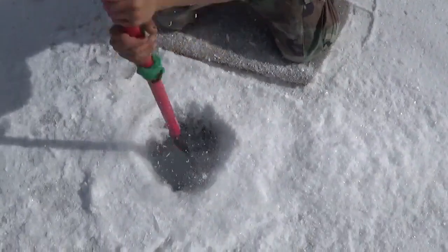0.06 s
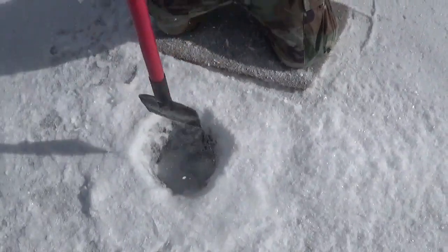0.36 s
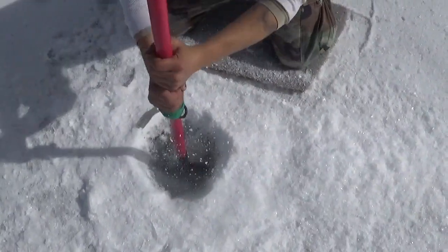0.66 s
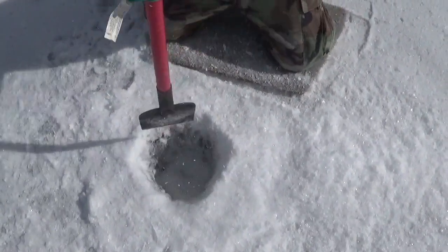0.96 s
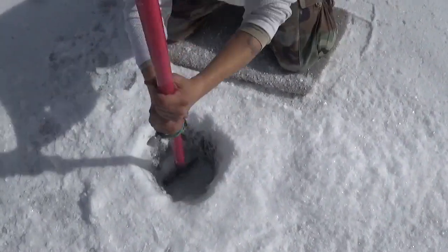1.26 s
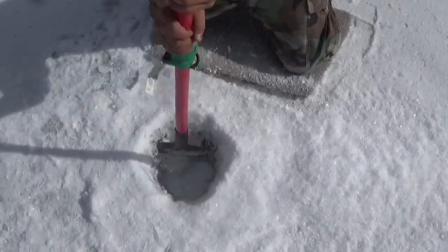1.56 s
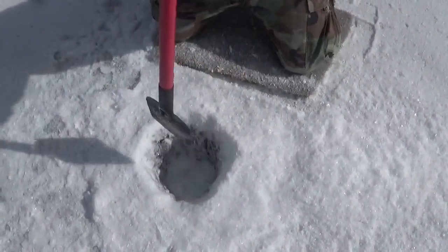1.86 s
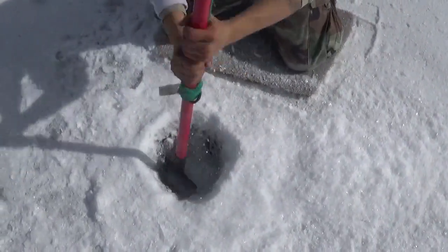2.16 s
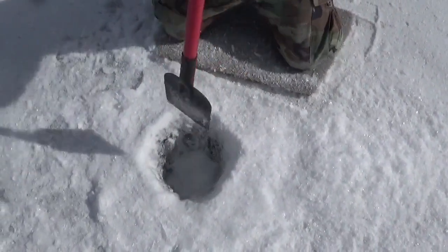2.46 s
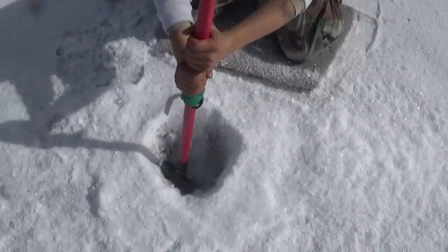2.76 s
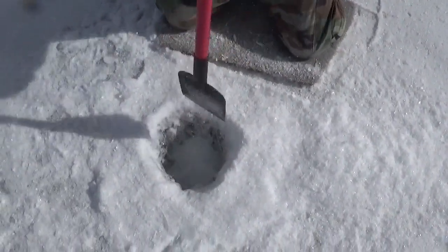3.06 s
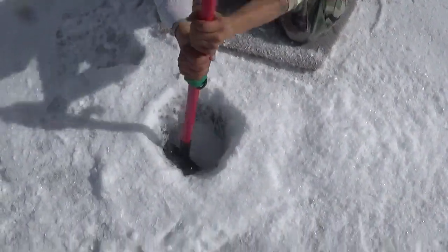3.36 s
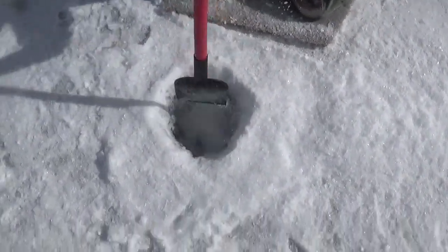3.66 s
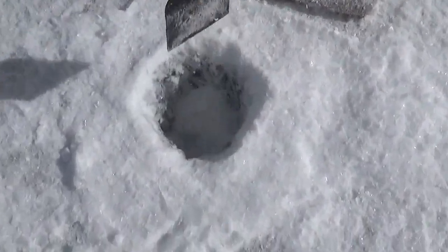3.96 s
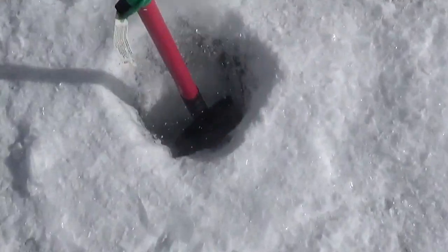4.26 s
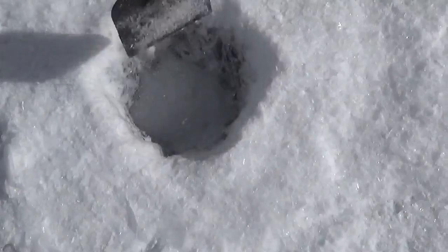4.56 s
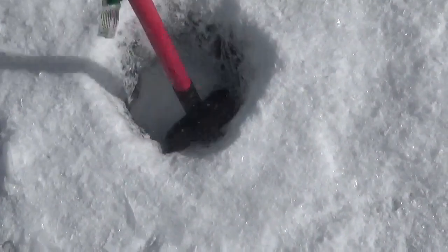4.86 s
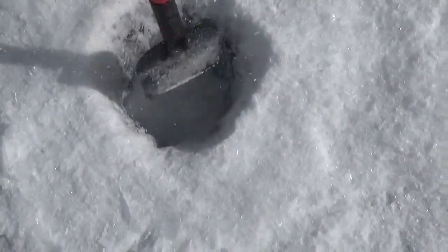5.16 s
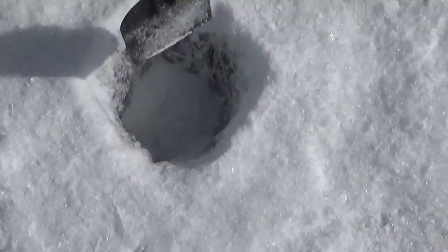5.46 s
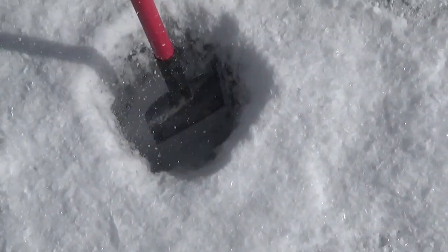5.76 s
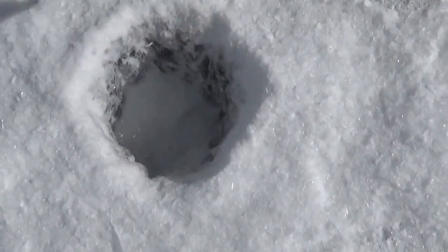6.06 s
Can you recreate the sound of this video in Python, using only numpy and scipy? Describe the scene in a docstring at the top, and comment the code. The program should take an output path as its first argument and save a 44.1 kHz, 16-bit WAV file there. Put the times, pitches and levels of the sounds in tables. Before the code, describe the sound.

A steel chisel chops into ice eight times, close by, with crisp crunches, short ringing scrapes and trickling chips.

```python
"""On a frozen lake, close by, a steel chisel on a pole chips a fishing hole, three strokes in two seconds.
Each stroke hisses through loose crystals, cracks the ice, thumps the sheet and scrapes out with a
ringing blade; chips trickle back into the hole. Behind it lie a faint rumble and a far-off hum.
Snow gives no echo, and a limiter flattens the loudest blows."""
import sys
import numpy as np
from scipy import signal
from scipy.fft import rfft, irfft, next_fast_len
from scipy.io import wavfile
from scipy.ndimage import uniform_filter1d, minimum_filter1d

SR = 44100
rng = np.random.default_rng(int(sys.argv[2]) if len(sys.argv) > 2 else 0)


def unload_wav(signal):
    """Save mono or channel-first audio to the path in sys.argv[1] as 16-bit WAV at rate SR, clipped to [-1, 1]."""
    wavfile.write(
        sys.argv[1],
        SR,
        np.round(np.clip(np.atleast_2d(signal).T, -1, 1) * 32767).astype(np.int16),
    )


N = 273861
TIME = np.arange(N) / SR

# Chisel strokes. Each row: start of the bite in seconds, its length in seconds, run-in through loose
# crystals in seconds, run-in hiss in dB, thump in dB, seconds the rubble stays stirred, chips in dB,
# crystals in dB, settling in dB per second. thumps() and stirring() follow these rows too.
CHISEL_STROKES = [(0.575, 0.051, 0.0086, -26, -27.5, .6, -21, -29, 31),
                  (1.315, .021, 0.058, -17, -31.5, .23, -24.5, -26, 13),
                  (2.032, 0.019, 0.043, -29.5, -27.5, 0.42, -24.5, -28, 34),
                  (2.702, 0.028, 0.056, -16, -17.5, 0.37, -22.5, -21.5, 31),
                  (3.393, .027, 0.061, -18, -15, 0.35, -24, -27, 44),
                  (4.194, .03, .034, -24.5, -28, 0.63, -19.5, -26.5, 49),
                  (4.899, 0.023, 0.047, -17.5, -14.5, 0.54, -18, -24, 52.5),
                  (5.584, 0.024, 0.057, -17.5, -21.5, 0.18, -35, -31, 25)]
# Ice splitting off as the blade enters and levers. Each row: start in seconds, length in seconds,
# dull body in dB, crisp spray in dB, pitch of the hollow in Hz.
SPLITS = [(0.41, 0.0039, -69, -23, 1910), (0.449, .002, -59, -26, 1830), (0.556, 0.018, -12, -16.5, 1770),
          (0.666, 0.0077, -26.5, -27, 680), (0.718, .019, -21.5, -48, 707), (1.53, 0.0069, -14, -3, 2100),
          (1.698, .004, -58, -16.5, 680), (1.966, 0.0083, -28, -31, 1830),
          (1.981, 0.0094, -14.5, -17.5, 1830), (2.004, 0.0022, -16, -25, 1705),
          (2.093, .004, -32, -15.5, 1660), (2.113, 0.0063, -20.5, -23, 655),
          (2.298, 0.028, -19.5, -26, 1790), (2.327, 0.0063, -17.5, -27, 1830),
          (2.619, 0.0044, -38, -17, 1900), (2.823, 0.0086, -17.5, -48, 830),
          (3.003, 0.0081, -15, -19.5, 1860), (3.339, .028, -32, -12.5, 2260),
          (3.473, .0058, -18, -20.5, 2080), (3.842, 0.0059, -25, -27, 1790),
          (3.985, 0.0048, -18, -28, 1770), (4.004, 0.0019, -29, -17, 2030),
          (4.16, 0.0018, -16.5, -11.5, 876), (4.169, 0.0039, -17, -15, 1670), (4.262, 0.023, -16, -21, 925),
          (4.356, 0.0074, -14, -29, 833), (4.942, 0.0028, -20, -25, 1930), (4.965, 0.012, -14, -17, 1410),
          (4.984, 0.0074, -12.5, -14, 680), (5.011, .0061, -12.5, -13, 680), (5.036, 0.0067, -13, -22, 736),
          (5.064, 0.002, -11.5, -30, 685), (5.544, 0.0053, -14.5, -12.5, 1880),
          (5.626, 0.0027, -19.5, -8.5, 1920), (5.643, 0.0031, -19, -16, 2280),
          (5.656, 0.018, -19.5, -17, 1760), (5.717, 0.004, -24, -19.5, 2060),
          (5.779, .0015, -16, -29, 1960)]
# Lumps dropping back into the hole. Each row: start in seconds, level in dB.
FALLING_LUMPS = [(0.481, -36.5), (0.512, -39.5), (0.94, -25), (1.024, -30), (1.067, -28.5), (1.119, -32),
                 (2.573, -26.5), (3.222, -28.5), (3.279, -29), (4.529, -32.5), (5.239, -29), (5.26, -25.5),
                 (5.297, -27.5), (5.319, -29.5)]


def cracks():
    """Each stroke bites crisply, then breaks through with a dull crunch; ice splits and lumps shatter."""
    out = np.zeros(N)
    for start, bite_s, *_ in CHISEL_STROKES:
        add(out, start, fracture(bite_s, body_db=-14.5, crisp_db=-11, hollow_hz=950))
        add(out, start + bite_s, fracture(0.022, body_db=-14, crisp_db=-23, hollow_hz=758))
    for start, *split in SPLITS:
        add(out, start, fracture(*split))
    for start, db in FALLING_LUMPS:
        add(out, start, fracture(0.0038, body_db=db, crisp_db=db - 8, hollow_hz=1830))
    return out


# The tone of a break's dull body and of its crisp spray. Each row: frequency in Hz, gain in dB.
BODY_TONE = [(100, -30), (200, -20), (400, -9.5), (650, -2), (1300, 2.5), (1900, 5), (2600, -3),
             (3600, -21.5), (6000, -38)]
SPRAY_TONE = [(1200, -26), (2600, -12.5), (3500, -3), (5000, -4.5), (6500, -3), (8700, 3.5), (10900, -4)]


def fracture(length_s, body_db, crisp_db, hollow_hz):
    """One break rings the hollow under the blade and throws off a crisp spray."""
    held = int((length_s + 0.0015) * SR)
    snap = burst(length_s, fade_s=0.0045, rate=6000, spread_db=3.5, accent_db=5.5)
    fits = flicker(len(snap), rate=357, depth_db=4)
    body = level(colour(snap * fits, BODY_TONE), -2.66, held)
    body += level(ring(snap * fits, hollow_hz, ring_s=0.044), -7.5, held)
    # the less body a break has, the brighter its spray
    tilt_db = -3 + 1.19 * (crisp_db - body_db)  # per octave, around 6000 Hz
    tilted = [(hz, db + tilt_db * np.clip(np.log2(hz / 6000), -.5, .5)) for hz, db in SPRAY_TONE]
    splinters = burst(length_s, fade_s=0.0021, rate=8000, spread_db=-1, accent_db=3)
    spray = colour(fits * splinters, tilted)
    # each shard pings briefly at a pitch of its own
    octaves = rng.uniform(-.7, .7, 2 + held // 100) + np.clip(tilt_db / 30, -.3, .3)
    shards = sum(level(ring(spray, hz, ring_s=0.021), 0, held) for hz in 5200 * 2 ** octaves)
    crisp = level(spray, 1, held) + level(shards, -5.5, held)
    return undb(body_db) * body + undb(crisp_db) * crisp


# The blade touching the wall. Each row: start in seconds, length in seconds, freedom to ring from
# 0 (gripped by ice) to 1 (free), grit in dB, ringing in dB, place on the blade from 0 to 4.
WALL_TOUCHES = [(0.059, 0.011, 1, -30, -19, 0), (.134, 0.0054, 1, -12, -10, 4),
                (.179, 0.026, 0.62, -30, -18.5, 2.2), (0.207, 0.015, 0.97, -38, -24, 2),
                (0.3255, 0.0044, 0.48, -27, -19.5, 3.5), (1.379, 0.025, .59, -21.5, -19.5, .15),
                (1.44, 0.031, 0.33, -21, -20, 0.5), (1.533, 0.017, 0.94, -30, -12.5, 3.5),
                (2.304, 0.0043, .99, -20, -16.5, 2.5), (2.845, 0.0053, 0.33, -17, -9.5, 0.5),
                (2.9, 0.03, 0.28, -24, -19.5, 0.65), (2.968, 0.026, 0.4, -21, -19.5, 1.5),
                (3.015, 0.02, 1, -39, -13, 2.5), (3.05, 0.0032, .8, -36, -18, 1.5),
                (3.489, 0.01, 0.47, -24, -19.5, 0.3), (3.605, 0.011, 0.3, -26, -16.5, 1),
                (3.633, 0.049, 0.088, -43, -31.5, 1.54), (4.4267, 0.0016, 0.86, -15, -17.5, 3),
                (5.071, 0.019, 0.56, -14.5, -17.5, 1.5), (5.785, 0.0089, 1, -31, -6, 2),
                (5.822, 0.025, 1, -20, -15, 2.3)]
# The steel's notes. Each row: a family that rings together, giving for every note its pitch in Hz,
# level in dB and ring time in seconds when free.
BLADE_NOTES = [
    [(2035, -3, 0.18), (862, -29, 0.32)],
    [(2479, -3.5, 0.12), (2502, -5, 0.1), (5600, -1, 0.037)],
    [(3403, 0, 0.14), (3740, -12, 0.12), (5510, -16.5, .05), (6980, -16, 0.06)],
    [(4200, 0.5, 0.11), (5800, -10, 0.024), (6600, -17, 0.058)],
    [(4830, -3.5, 0.072), (9920, -8.5, 0.056)],
    [(8700, -2, 0.1), (8740, -3, 0.1), (8020, -25, 0.082), (9430, -9.5, 0.089)],
]
# Places 0 to 4 on the blade: tip of the edge, middle of the edge, flat, shoulder, corner.
# Each row: gain in dB for each of the six families, then for the one lingering note.
BLADE_PLACES = [(-26, -37, -25, -23, -44, 2.5, -38), (-26, -39, 3.5, -20, -43, 1, -40),
                (-0.5, -13, -7.5, -12.5, -7, -12, -15), (-12.5, 1, -17.5, -14, -8.5, -16.5, -17),
                (-15, -12, -12, -2.5, 2.5, -30, -24)]
# The tone of the gritty scrape. Each row: frequency in Hz, gain in dB.
GRIT_TONE = [(100, -47), (300, -31), (550, 6.5), (900, 18.5), (1900, -1), (3000, 12), (4300, 19), (6500, 2),
             (10500, -11)]


def blade():
    """The edge chatters over the wall; gripping ice damps and detunes the steel, a free blade rings on."""
    out = np.zeros(N)
    next_starts = [row[0] for row in WALL_TOUCHES[1:]] + [np.inf]
    for (start, length_s, freedom, grit_db, ring_db, place), stop in zip(WALL_TOUCHES, next_starts):
        *family_db, linger_db = ring_db + place_gains(place)
        freedom = np.clip(freedom, .1, 1)
        held = int((length_s + 0.0012) * SR)
        chatter = burst(length_s, fade_s=0.0053, rate=8000, spread_db=5, accent_db=7, count=12288)
        sound = level(colour(chatter, GRIT_TONE), grit_db, held)
        for family, drive_db in zip(BLADE_NOTES, family_db):
            for hz, db, ring_s in family:
                detune = 1 + 0.016 * (1 - freedom) * rng.standard_normal()
                sound += level(ring(chatter, hz * detune, ring_s * freedom), db + drive_db, held)
        t = np.arange(len(sound)) / SR
        tap = 1. * (t == 0)
        sound += level(ring(tap, hz=2215, ring_s=0.49 * freedom), linger_db, held)
        # the next touch chokes whatever still rings
        choke = np.clip((stop - start - t) / 0.0036, 0, 1) ** 2
        add(out, start, sound * choke)
    return out


def place_gains(place):
    """How hard a touch drives the steel's notes, in dB, blended between neighbouring places."""
    places = np.arange(len(BLADE_PLACES))
    gains = [np.interp(place, places, undb(column)) for column in np.transpose(BLADE_PLACES)]
    return 20 * np.log10(gains)


# The thud's notes: the ice sheet's low notes, and the hollow of the hole at 680 Hz. Each row: pitch in Hz,
# relative level in dB, ring time in seconds.
THUD_NOTES = [(219, -9.5, 0.12), (265.3, 4, 0.068), (287, -4, 0.095), (680, -6, 0.2)]


def thumps():
    """At the end of each bite the pole's weight dents the ice sheet, which springs straight back."""
    out = np.zeros(N)
    t = np.arange(SR // 4) / SR
    push = np.diff(t * np.exp(-t / 0.00053), prepend=0)
    thud = sum(level(ring(push, hz, ring_s), db) for hz, db, ring_s in THUD_NOTES)
    for start, bite_s, _, _, thump_db, *_ in CHISEL_STROKES:
        add(out, start + bite_s, level(thud, thump_db, first=int(0.013 * SR)))
    return out


# The tone of tumbling chips and of fine crystals. Each row: frequency in Hz, gain in dB.
CHIP_TONE = [(60, -41), (150, -13.5), (280, -7), (400, -9.5), (521, -5.5), (700, -6.5), (850, -1),
             (1020, 0), (1210, -7.5), (1500, -7), (1850, -1), (2600, -12.5), (4000, -10), (8000, -33)]
CRYSTAL_TONE = [(600, -36.5), (1500, -6.5), (2300, -1), (3000, -5), (3600, -3), (5000, -4), (6400, -6),
                (8800, 1.5), (10900, -5.5)]


def loose_ice():
    """Chips tumble in the hollow with brief notes; fine crystals hiss and tick along the blade."""
    chip_motion, crystal_motion = stirring()
    pitches = np.geomspace(480, 3800, num=14)
    notes = sum(level(ring(grains(N, rate=80, spread_db=4), hz, ring_s=0.021), 0) for hz in pitches)
    ticks = level(grains(N, rate=67, spread_db=2.5), 0)
    tumble = level(notes, -2.3) + level(grains(N, rate=1900, spread_db=2), 0) + undb(-6) * ticks
    fizz = grains(N, rate=7000, spread_db=2) * flicker(N, rate=210, depth_db=3.5)
    hiss = level(fizz, 0) + undb(-4) * ticks
    chips = level(colour(tumble, CHIP_TONE), -1.32)
    crystals = level(colour(hiss, CRYSTAL_TONE), 2.52)
    return chips * chip_motion + crystals * crystal_motion


# Loose ice sliding down the wall or off the blade; the first rows are rubble still stirring from a stroke #
# that landed just before the sound begins. # Each row: start in seconds, length in seconds, chip gain in dB,
# crystal gain in dB.
ICE_SLIDES = [(0, .02, -22.5, -27.5), (0.083, 0.064, -27, -24.5), (0.234, 0.24, -51, -43.5),
              (0.646, 0.069, -28, -43), (0.786, .08, -47, -35), (1.038, .13, -41.5, -47),
              (1.68, 0.087, -49, -45.5), (2.218, 0.068, -33, -28), (3.226, 0.056, -40.5, -38),
              (3.528, .1, -26.5, -35), (3.727, 0.093, -40.5, -39), (3.868, 0.18, -41.5, -29),
              (4.684, 0.015, -41, -40), (5.736, .11, -29.5, -24), (6.06, 0.11, -36, -48),
              (6.18, 0.036, -52, -31)]


def stirring():
    """How strongly chips and crystals move: the blade runs in, stirs the rubble, and some slides back."""
    chips, crystals = [np.full(N, undb(-57.5))], [np.full(N, undb(-52.5))]  # the rubble never quite rests
    delay_s = 0.05  # from the bite to the fullest stirring
    for start, _, run_s, run_db, _, stir_s, chips_db, crystals_db, settle_db in CHISEL_STROKES:
        entry = start - run_s
        run_in = undb(run_db) * swell(entry, hold_s=0.71 * run_s, rise_s=0.26 * run_s, fall_s=0.016)
        # on its way down the blade brushes the wall
        run_in += undb(run_db - 16.5) * swell(entry, hold_s=0, rise_s=0.061, fall_s=0.016)
        stir = swell(start + delay_s, stir_s - delay_s, rise_s=0.023, fall_s=0.031, sag_db=settle_db)
        chips += [undb(chips_db) * stir, undb(-15.5) * run_in]
        crystals += [undb(crystals_db) * stir, run_in]
    for start, length_s, chips_db, crystals_db in ICE_SLIDES:
        slide = swell(start, length_s, rise_s=0.017, fall_s=0.025)
        chips.append(undb(chips_db) * slide)
        crystals.append(undb(crystals_db) * slide)
    return np.linalg.norm(chips, axis=0), np.linalg.norm(crystals, axis=0)


# The tone of the open air. Each row: frequency in Hz, gain in dB.
AIR_TONE = [(20, -10), (55, -6.5), (90, 0), (115, -6), (250, -5), (600, -5), (2000, -49), (6000, -36),
            (11000, -13)]


def air():
    """A faint outdoor rumble."""
    return level(colour(rng.standard_normal(N), AIR_TONE, size=8192), -48.5)


# How the hum swells and fades. Each row: time in seconds, gain in dB.
HUM_SWELLS = [(0.0, -73), (0.62, -63.5), (1.95, -62.5), (2.8, -51), (3.06, -65), (3.61, -54), (3.91, -63.5),
              (5.29, -57.5), (6.21, -64)]


def hum():
    """A low hum wavers far off."""
    drone = level(ring(rng.standard_normal(N), hz=90.3, ring_s=0.35), 4)
    return drone * undb(np.interp(TIME, *np.transpose(HUM_SWELLS)))


def undb(db):
    """Turn decibels into a gain to multiply by."""
    return 10 ** (np.asarray(db) / 20)


def level(x, db, first=None):
    """Set the average (rms) level, judged over the first samples or over all."""
    return x * undb(db) / np.sqrt(np.mean(x[:first] ** 2) + 1e-20)


def add(track, start, x):
    """Mix a short sound in at a start time in seconds."""
    i = max(int(start * SR), 0)
    track[i:i + len(x)] += x[:N - i]


def spectrum(points, hz):
    """Read a tone table at any frequency by joining its points along a musical (log) scale."""
    f, db = np.transpose(points)
    return np.interp(np.log(hz + 1), np.log(f), db)


def colour(x, points, size=1024):
    """Filter a sound so that it takes on the tone in a table."""
    hz = np.arange(size // 2 + 1) * SR / size
    cepstrum = irfft(np.log(undb(spectrum(points, hz))))
    # folding onto the first half keeps the filter from sounding before it is struck
    cepstrum[1:size // 2] *= 2
    cepstrum[size // 2 + 1:] = 0
    response = irfft(np.exp(rfft(cepstrum)))
    return signal.fftconvolve(x, response)[:len(x)]


def ring(x, hz, ring_s):
    """One note set ringing by x; it fades by 60 dB in ring_s seconds."""
    radius = np.exp(-np.log(1000) / (ring_s * SR))
    return signal.lfilter([0, 1], [1, -2 * radius * np.cos(2 * np.pi * hz / SR), radius ** 2], x + 1e-18)


def grains(count, rate, spread_db):
    """Tiny fractures of uneven size at random moments, about `rate` of them a second."""
    when, chance, sign = rng.random((int(rate * count / SR) + 1, 3)).T
    size = undb(spread_db * np.minimum(-np.log(1 - chance), 4))
    return np.bincount((when * count).astype(int), size * np.sign(sign - .5), count)


def burst(length_s, fade_s, rate, spread_db, accent_db, count=4096):
    """A run of fractures, strongest at first touch, that holds and then dies away."""
    t = np.arange(count) / SR
    accent = 1 + undb(accent_db) * np.exp(-t / 0.003)
    return grains(count, rate, spread_db) * accent * np.exp(-np.maximum(t - length_s, 0) / fade_s)


def flicker(count, rate, depth_db):
    """A gain that jumps about: ice gives way in fits and starts."""
    steps = rng.standard_normal(int(rate * count / SR) + 2)
    return undb(depth_db * np.interp(np.arange(count) * rate / SR, np.arange(len(steps)), steps))


def swell(peak_s, hold_s, rise_s, fall_s, sag_db=0):
    """A gain that rises until peak_s, holds while sagging by sag_db a second, then dies away."""
    t = TIME - peak_s
    shape = np.exp(np.minimum(t, 0) / rise_s - np.maximum(t - hold_s, 0) / fall_s)
    return shape * undb(-sag_db * np.maximum(t, 0))


# Stereo width. Each row: frequency in Hz, left-right difference in dB against the shared sound.
STEREO_WIDTH = [(60, -26), (190, -8), (340, -5.5), (600, -1), (1060, -0.5), (1870, -1), (3330, -4.5),
                (5910, -8), (10500, -12)]


def scene():
    """Two close microphones hear the hole a little to one side: their difference is a quarter cycle off."""
    bass_cut = signal.butter(3, 150, "highpass", fs=SR, output="sos")  # the close microphones pass little bass
    chipping = signal.sosfilt(bass_cut, cracks() + blade() + thumps() + loose_ice())
    mid = chipping + air() + hum()
    size = next_fast_len(N)
    hz = np.arange(size // 2 + 1) * SR / size
    side = irfft(-1j * undb(spectrum(STEREO_WIDTH, hz)) * rfft(mid, size), size)[:N]
    side += undb(-7) * air()
    return np.array([mid + side, mid - side]) * undb([[.1], [-.1]])


def record(dry):
    """A fast limiter turns the loudest peaks down, and the highest treble is cut."""
    ceiling, top_hz = 0.92, 10950
    gain = np.minimum(1, ceiling / (np.abs(dry).max(axis=0) + 1e-9))
    gain = uniform_filter1d(minimum_filter1d(gain, size=90), size=90)  # smoothed over about 2 ms
    treble_cut = signal.ellip(10, .2, 70, top_hz, fs=SR, output="sos")
    return signal.sosfilt(treble_cut, dry * gain)


dry = scene()
out = record(dry)
unload_wav(out)
```